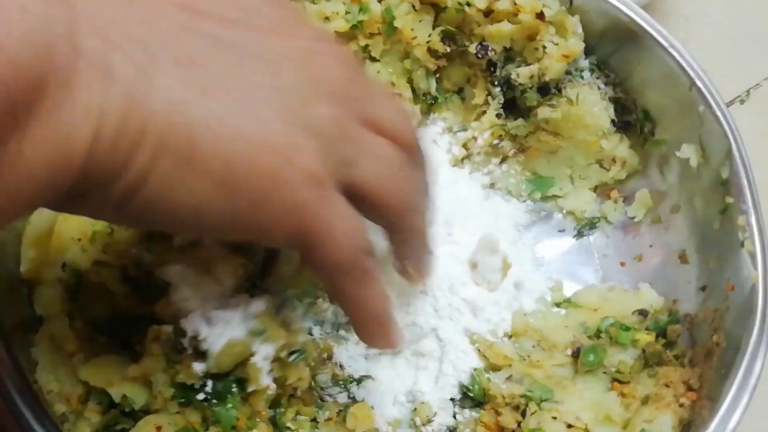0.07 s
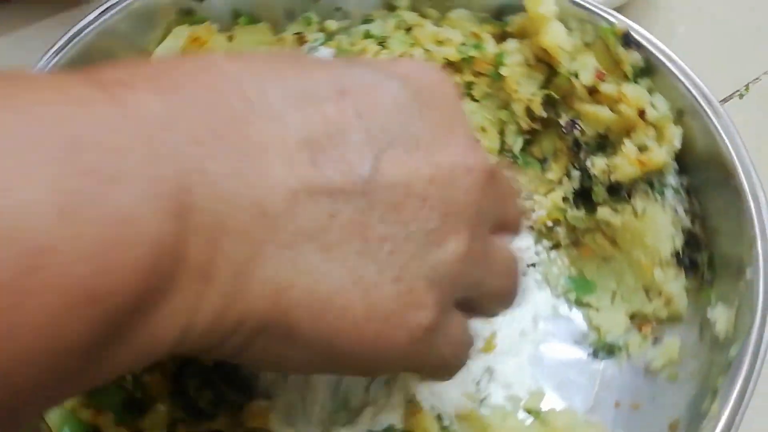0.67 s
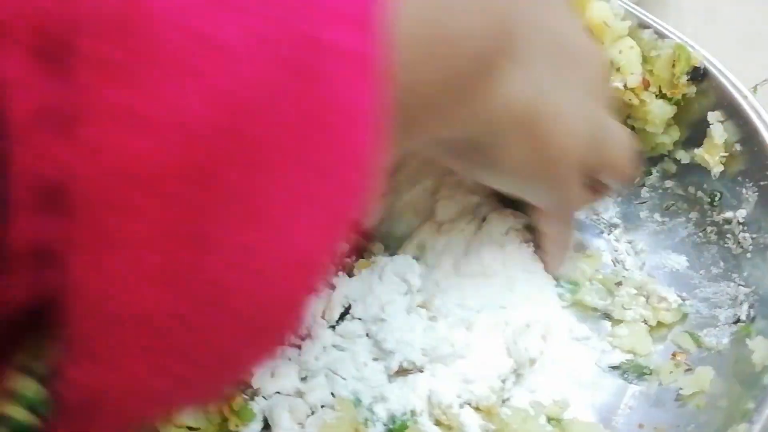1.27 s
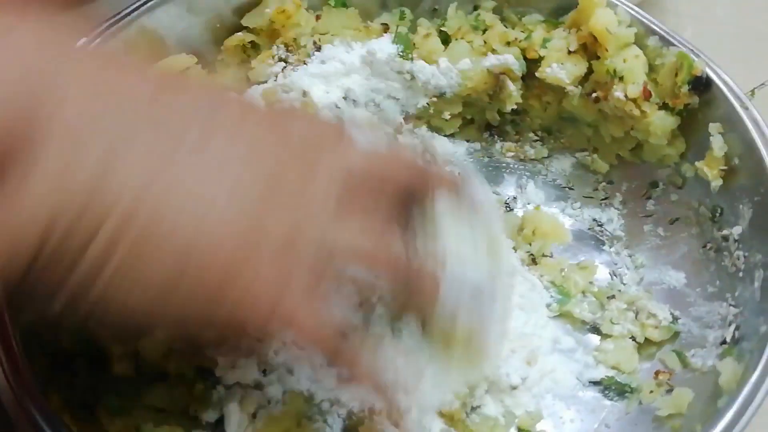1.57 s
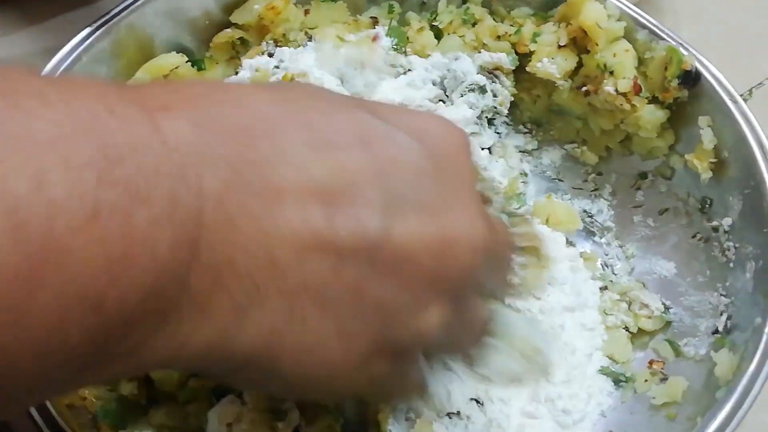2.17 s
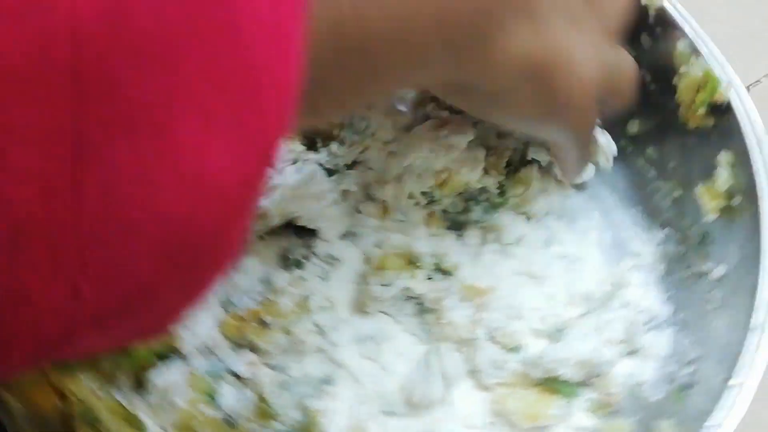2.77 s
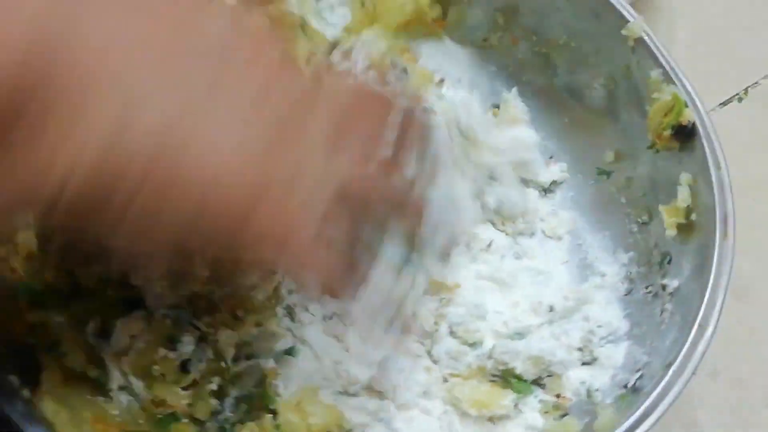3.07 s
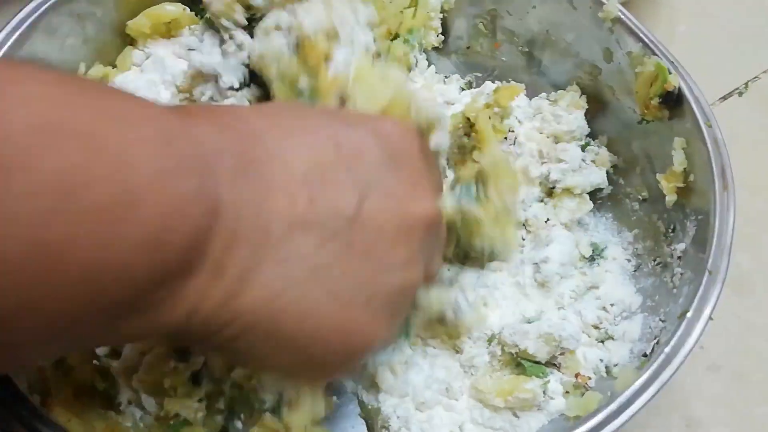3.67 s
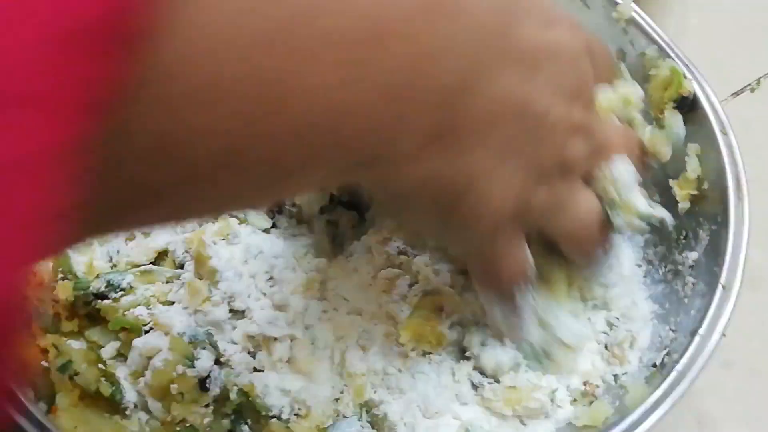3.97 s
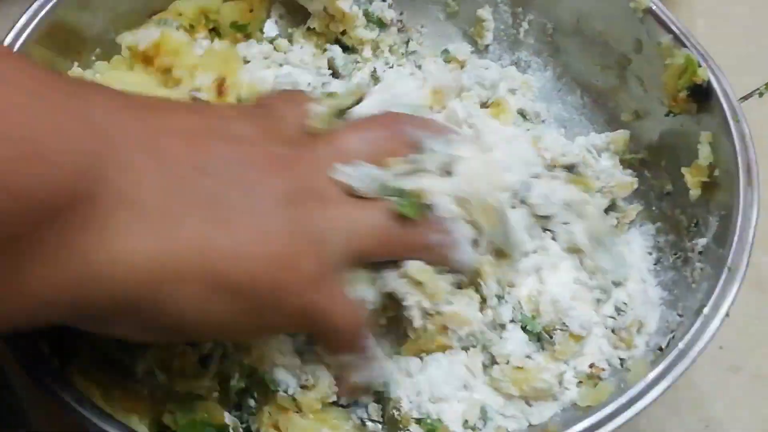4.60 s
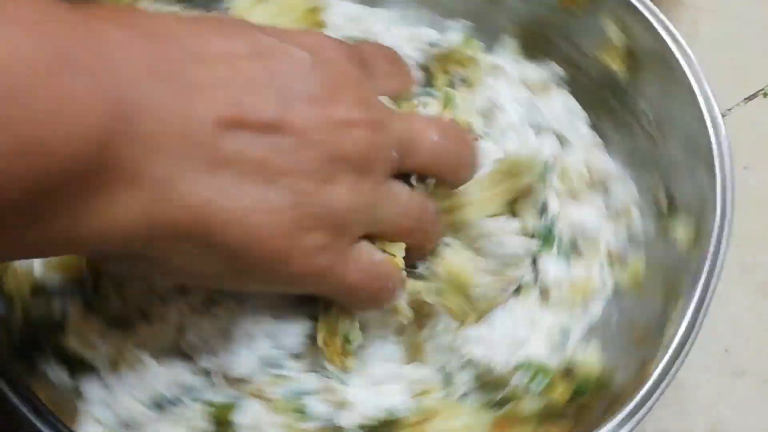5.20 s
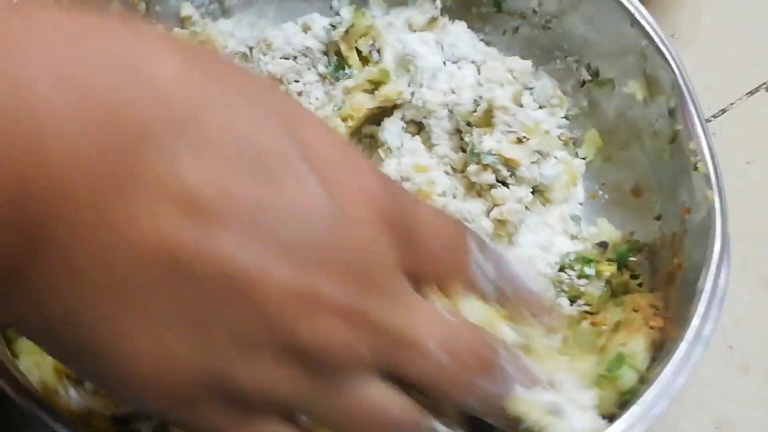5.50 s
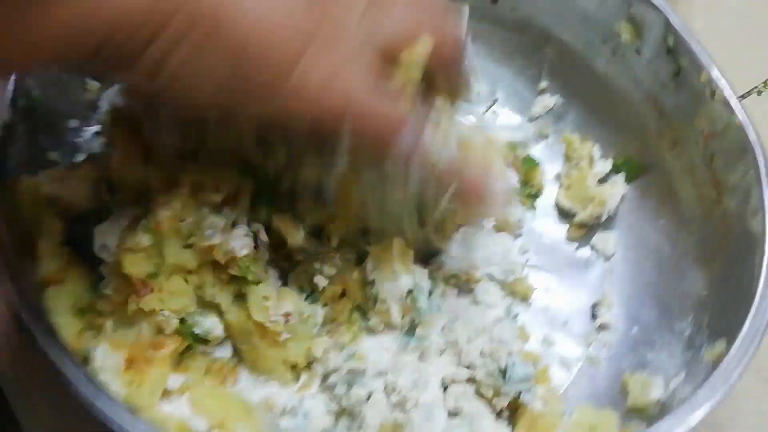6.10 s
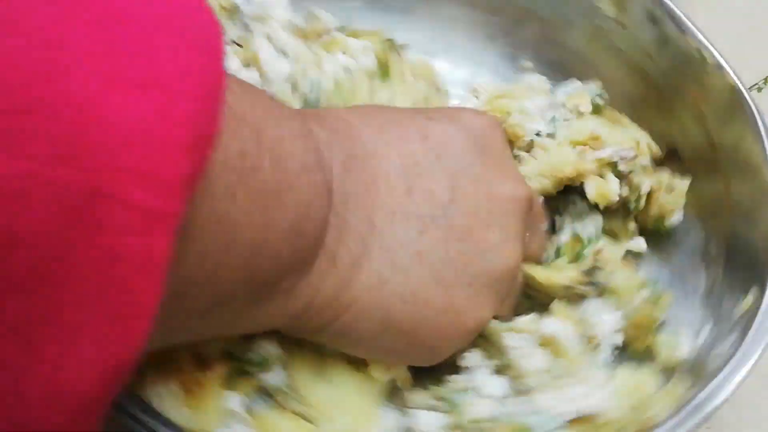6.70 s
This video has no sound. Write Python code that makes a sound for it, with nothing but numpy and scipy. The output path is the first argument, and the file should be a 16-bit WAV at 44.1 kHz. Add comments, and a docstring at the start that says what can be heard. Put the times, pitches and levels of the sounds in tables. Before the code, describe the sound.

A bare hand works flour into mashed potato in a steel bowl, close and fairly dry, over the steady low rumble of a small, hard kitchen. Crumbs scatter with a sticky pop at 0.2 seconds. At about 0.7 seconds the bowl clatters on the tiles and rings briefly, the loudest moment. Flour hisses along the steel around 1 second, and again near 2.4, 4.1 and 5.6 seconds. Throughout, uneven squeezes bring soft squelches, wet crackles and small smacking pops, with occasional thin ticks of flecks hitting metal. From 2.5 to 3.1 seconds the bowl rasps faintly, then shifts with a dull grind and gives a lighter ringing knock at about 3.25 seconds. In the second half the mixing sounds moister, with a fuller squish near 5.9 seconds and soft fingertip plops from 6 seconds until the end, just before 7.

```python
"""A bare hand works flour into mashed potato in a steel bowl, over the low rumble of a small hard kitchen.
First flour hisses along the steel and crumbs scatter; within a second the bowl clatters on the tiles and
rings in its modes. The hand squeezes on: wet films tear with a squelch and air pockets pop. Towards three
seconds the bowl rasps by stick-slip friction, then knocks again. In the second half the sweeps of flour
carry more mash, and fingertips press soft plops from the dough to the end."""
import sys
import numpy as np
from scipy import signal
from scipy.fft import rfft, irfft
from scipy.io import wavfile
from scipy.ndimage import uniform_filter1d

SR = 44100
rng = np.random.default_rng(int(sys.argv[2]) if len(sys.argv) > 2 else 0)


def to_wav(sig):
    """Store sig (one row per channel, or 1-D mono) as 16-bit WAV at the path in sys.argv[1].

    Samples outside -1..1 are clipped; the rate is SR.
    """
    pcm = np.clip(np.atleast_2d(sig), -1, 1) * 32767
    pcm = np.round(pcm).astype(np.int16)
    wavfile.write(sys.argv[1], SR, pcm.T)  # frames by channels


N = 302085
TIME = np.arange(N) / SR
# spectrum of a thin, bright snap: frequency_hz, level_db
SNAP_SPECTRUM = [(800, -37), (2000, -40), (3200, -11), (5000, 4), (7500, 8), (10300, 11), (12500, -7),
                 (16000, -55)]


def amp(db):
    """Decibels as an amplitude ratio."""
    return 10 ** (np.asarray(db) / 20)


def unit(x):
    """Normalisation to an rms of 1."""
    return x / np.sqrt(np.mean(x ** 2) + 1e-20)


def read(points, hz):
    """Interpolation of a table on a logarithmic frequency axis."""
    f, value = np.transpose(points)
    return np.interp(np.log(hz + 1), np.log(f), value)


def add(mix, s, sound):
    """Superposition: a two-channel sound joins the mix at time s."""
    part = mix[:, round(s * SR):][:, :sound.shape[1]]
    part += sound[:, :part.shape[1]]


def colour(x, spectrum, size=2048):
    """Spectral shaping by a minimum-phase filter of unit energy."""
    log_gain = np.log(amp(read(spectrum, abs(np.fft.fftfreq(size, 1 / SR)))))
    taps = np.fft.ifft(np.exp(np.conj(signal.hilbert(log_gain)))).real
    return signal.fftconvolve(x, taps[None] / np.linalg.norm(taps), axes=1)[:, :x.shape[1]]


def band(x, hz, q):
    """A fixed second-order resonance of quality factor q."""
    return signal.lfilter(*signal.iirpeak(hz, q, SR), x)


def resonate(x, hz, width_hz):
    """A gliding resonance by heterodyning: shift the curve hz down to zero, smooth twice, shift back."""
    carrier = np.exp(2j * np.pi * np.cumsum(hz) / SR)
    pole = np.exp(-np.pi * width_hz / SR)
    return (carrier * signal.lfilter([(1 - pole) ** 2], [1, -2 * pole, pole * pole], x / carrier)).real


def pair(x):
    """Spatial coherence: mid and side signals become two close microphones, most alike in the bass."""
    # likeness of the microphones: frequency_hz, coherence
    likeness = [(130, 1), (300, 0.88), (700, 0.5), (1400, 0.78), (3100, 0.29), (6800, 0.33), (10000, 0.8),
                (15000, 0.6)]
    coherence = np.clip(read(likeness, np.fft.rfftfreq(x.shape[1], 1 / SR)), 0, 1)
    mid, side = rfft(x) * np.sqrt([(1 + coherence) / 2, (1 - coherence) / 2])
    return irfft(np.array([mid + side, mid - side]), x.shape[1])


def flutter(per_s, depth_db):
    """Random modulation: a factor that wanders about 1."""
    knots = np.arange(0, TIME[-1] + 1, 1 / per_s)
    return amp(depth_db * np.interp(TIME, knots, rng.standard_normal(len(knots))))


def swell(peak_s, length_s, rising=0.75, shape=2):
    """An envelope that peaks at 1; rising is the share spent growing, shape 1 is pointed and 2 rounded."""
    offset = np.linspace(-2, 2, 201)
    distance = np.maximum(-offset / rising, offset / (1 - rising))
    return np.interp(TIME, peak_s + length_s * offset, np.exp(-distance ** shape), 0, 0)


def grains(per_s, spread_db, size=N):
    """Shot noise: a random train of tiny ruptures of unequal strength."""
    strength = amp(spread_db * np.minimum(rng.exponential(1, size), 4.5))
    return unit(rng.standard_normal((2, size)) * strength * (rng.random(size) < per_s / SR))


def contact(fade_s, chatter, size=2048):
    """Impact excitation: one sharp push, then a fading rattle whose relative strength is chatter."""
    burst = rng.standard_normal((2, size)) * np.exp(-np.arange(size) / SR / fade_s)
    burst *= chatter / np.linalg.norm(burst, axis=1, keepdims=True)
    burst[0, 0] += 1
    return burst / np.linalg.norm(burst[0])


def room_tone():
    """Background noise: a slowly sinking rumble, a wavering hum that swells once, and faint steady hiss."""
    # spectra of the rumble and the hiss: frequency_hz, level_db
    rumble_spectrum = [(25, -12.5), (56, -26.5), (72, -10), (88, 0.5), (108, 1), (145, -6.5), (175, -3),
                       (200, -6.5), (225, -16.5), (290, -20.5), (385, -20), (480, -34.5), (1000, -56.5)]
    air_spectrum = [(100, -27), (400, 1.5), (1500, -4), (3000, -6), (6000, -14.5), (10000, -68),
                    (16000, -43)]
    hum_hz, sink_db_per_s = 165, 0.67
    rumble = colour(rng.standard_normal((2, N)), rumble_spectrum, size=16384)
    rumble *= amp(-40 - sink_db_per_s * TIME)
    cycles = np.cumsum(hum_hz * flutter(per_s=9, depth_db=-0.48)) / SR
    hum_level = amp(-56.5) + amp(-45.5) * swell(peak_s=2.42, length_s=0.99)
    hum = hum_level * unit(np.sin(2 * np.pi * cycles) * flutter(per_s=5.2, depth_db=6.0))
    air = amp(-61) * colour(rng.standard_normal((2, N)), air_spectrum)
    return hum + pair(rumble + air)


def kitchen(x):
    """Reverberation: dense reflections off tiles, lasting longest in the lower middle range."""
    # reverberation time: frequency_hz, t60_s
    decay_times = [(150, 0.047), (400, 0.75), (1400, 0.46), (3000, 0.46), (5000, 0.48), (9000, 0.29),
                   (15000, 0.042)]
    build_up = np.clip(TIME[:SR] / 0.0062 - .5, 0, 1)
    reflections = rng.standard_normal((2, SR)) * (rng.random((2, SR)) < 0.1) * build_up
    hz, t, spectra = signal.stft(pair(reflections), SR, nperseg=256)
    decay = amp(-60 * t / read(decay_times, hz)[:, None])
    tail = signal.istft(spectra * decay, SR, nperseg=256)[1]
    tail /= np.linalg.norm(tail, axis=1, keepdims=True)
    return signal.fftconvolve(x.mean(0)[None], tail, axes=1)[:, :x.shape[1]]


def wobbles():
    """Rocking oscillation: the loaded bowl throbs briefly under the hand."""
    # throbs: start_s, length_s, level_db, first_hz, last_hz
    throbs = [(0.242, 0.083, -44, 127.6, 105), (1.712, 0.1, -37, 88.7, 90), (3.223, 0.075, -47, 53, 73),
              (3.264, 0.19, -35, 81.3, 93.3), (4.796, 0.2, -39.5, 87, 95), (5.035, 0.096, -40, 89.4, 91)]
    out = np.zeros((2, N))
    for s, length, db, first_hz, last_hz in throbs:
        hz = np.linspace(first_hz, last_hz, round(length * SR))
        throb = np.sin(2 * np.pi * np.cumsum(hz) / SR) * signal.windows.tukey(len(hz), .7)
        add(out, s, amp(db) * np.tile(unit(throb), (2, 1)))
    return out


def shoves():
    """Stick-slip friction: the shoved bowl grinds dully on its base."""
    # pushes on the bowl: start_s, level_db, fade_s
    pushes = [(0.0, -40, 0.053), (2.965, -41, 0.056), (3.105, -44, 0.066), (3.228, -44, 0.05),
              (6.16, -48, 0.084)]
    # spectrum of the grind: frequency_hz, level_db
    grind_spectrum = [(130, -25), (250, 0.5), (350, -3), (480, -9.5), (700, -12), (1300, -25), (3000, -61)]
    onset_s = 0.01
    out = np.zeros((2, N))
    t = TIME[:SR // 2]
    for s, db, fade_s in pushes:
        push = (1 - np.exp(-t / onset_s)) * np.exp(-t / fade_s)
        add(out, s, amp(db) * push * grains(per_s=1200, spread_db=1.5, size=len(t)))
    return pair(colour(out, grind_spectrum))


def skids():
    """Stick-slip friction: fine grit excites one broad resonance of the steel, and the room answers."""
    # rubs by the tiles or a finger: start_s, length_s, level_db, first_hz, last_hz, width_hz
    rubs = [(0.425, 0.17, -60, 1860, 1930, 400), (1.282, 0.14, -52, 3520, 3560, 900),
            (2.511, 0.17, -53.5, 1470, 1630, 700), (2.578, 0.36, -53, 1970, 1580, 750),
            (2.776, 0.33, -53.5, 1560, 1480, 700), (3.72, 0.32, -68.5, 3070, 3090, 700),
            (4.23, 0.3, -63.5, 1255, 1370, 380), (4.59, 0.14, -66, 3800, 3800, 800),
            (5.52, 0.14, -59.5, 1940, 1860, 320), (5.839, 0.13, -49, 1080, 1190, 550)]
    out = np.zeros((2, N))
    for s, length, db, first_hz, last_hz, width_hz in rubs:
        hz = np.linspace(first_hz, last_hz, round(length * SR))
        rasp = resonate(grains(per_s=4000, spread_db=4.5, size=len(hz)), hz, width_hz)
        add(out, s, amp(db) * unit(rasp * signal.windows.tukey(len(hz), .6)))
    out = pair(out)
    return out + amp(-0.5) * kitchen(out)


def hollow(x, load):
    """Damped resonances of the bowl join a sound made in it; their tuning shifts as the mash moves."""
    # resonances of the loaded bowl: centre_hz, width_hz, level_db
    resonances = [(870, 56, -3.5), (1130, 360, -6), (1417, 440, -5), (2210, 240, -10), (3220, 170, -2)]
    tuning = np.exp(0.042 * load) * np.ones(x.shape[1])
    return x + sum(2 * amp(db) * resonate(x, hz * tuning, width) for hz, width, db in resonances)


def ring(modes):
    """Free vibration: modes decay exponentially and reach each microphone in their own phase."""
    t = TIME[:SR]
    tones = sum(amp(db - 60 * t / t60) * np.sin(2 * np.pi * (hz * t + rng.random((2, 1))))
                for hz, db, t60 in modes)
    return tones * (1 - np.exp(-t / 0.00016))


def knocks():
    """Impact on the tiles excites the bowl's modes: a clack, ringing steel, a ping and splash of the rim."""
    # blows: start_s, level_db, cutoff_hz, ping_db, ring_and_room_db, struck_spot_hz, boom_db
    blows = [(0.6476, -26, 2530, -38, -6.5, 800, -24), (0.6503, -13.5, 3150, -34, -2, 2150, -20),
             (0.7075, -14.5, 3500, -2, -2.5, 1800, -2), (0.7442, -11.2, 4200, -5, -2.3, 1900, -4),
             (3.2494, -21, 5200, -28, -7, 2700, -5), (3.2537, -26, 7000, -24, -4.5, 2600, -4)]
    # modes of the bowl and of its rim: pitch_hz, level_db, t60_s
    bowl_modes = [(364, 3, .7), (1069, 3, .55), (1100, 4, .55), (1263, 2, .5), (1338, 5, .65),
                  (1484, 4, .7), (1507, 3, .6), (1542, 2, .55), (1880, 3, .5), (2165, 1, .45),
                  (3198, 1, .35)]
    rim_modes = [(8581, -13, .22), (8640, -14, .2), (8690, 0, .03), (12050, -3, .02), (15600, -19, .06)]
    # spectra of the clack and the splash: frequency_hz, level_db
    clack_spectrum = [(120, -43), (230, -12), (330, 4), (470, 1.5), (620, -1.5), (740, 0), (1350, 1.5),
                      (2300, -6), (3200, -5.5), (4200, -12), (7000, -10), (14000, -9.5)]
    splash_spectrum = [(2000, -35), (7500, 3), (10300, -1), (12300, -5), (16000, -15)]
    spot_width_hz, boom_hz = 240, 510
    out = np.zeros((2, N))
    impulse = signal.unit_impulse(SR) * np.ones((2, 1))
    for s, db, cutoff_hz, ping_db, ring_db, spot_hz, boom_db in blows:
        low_pass = signal.butter(4, cutoff_hz, fs=SR, output="sos")  # each knock has its own brightness
        strike = pair(contact(fade_s=.0036, chatter=1.8, size=SR))
        strike += amp(ring_db - 2.3) * kitchen(impulse)
        clack = signal.sosfilt(low_pass, hollow(colour(strike, clack_spectrum), load=0))
        clack += amp(7) * band(clack, spot_hz, q=spot_hz / spot_width_hz)
        clack += (amp(boom_db) - 1) * band(clack, boom_hz, q=1)  # turns down the boom of the base
        ping = amp(ping_db - 26) * ring(rim_modes)
        body = amp(ring_db - 28) * ring(bowl_modes)
        steel = pair(body + ping) + amp(2) * kitchen(ping)
        splash = amp(ping_db - 2.5) * colour(contact(fade_s=0.014, chatter=4.4, size=SR), splash_spectrum)
        add(out, s, amp(db) * (amp(21) * clack + steel + splash))
    return out


def ticks():
    """Light impacts: single dry flecks land on the steel with a thin, high click."""
    # flecks: start_s, level_db
    flecks = [(2.423, -29), (2.448, -22), (2.49, -18), (2.939, -20.5), (3.390, -24), (4.005, -30.5),
              (5.557, -29), (5.604, -24.5), (6.392, -19), (6.643, -21), (6.762, -28)]
    out = np.zeros((2, N))
    for s, db in flecks:
        add(out, s, amp(db) * contact(fade_s=0.002, chatter=2.4))
    return pair(colour(out, SNAP_SPECTRUM))


def spills():
    """Granular impacts: a shower of crumbs lands on the steel all at once and fades."""
    # showers: start_s, level_db, fade_s
    showers = [(0.195, -39, 0.016), (0.208, -35.5, 0.03), (1.553, -32.5, 0.011), (1.569, -29, 0.0031)]
    # spectrum of crumbs on steel: frequency_hz, level_db
    crumb_spectrum = [(300, 0), (800, -8.5), (1300, 7.5), (1900, -3), (2700, 5.5), (5000, 0), (10300, -4),
                      (12500, -16), (16000, -27)]
    out = np.zeros((2, N))
    t = TIME[:SR // 2]
    for s, db, fade_s in showers:
        add(out, s, amp(db) * np.exp(-t / fade_s) * grains(per_s=7000, spread_db=0.5, size=len(t)))
    return pair(colour(out, crumb_spectrum))


def plop(hz, rise_hz, fade_s):
    """Cavity resonance: a small air pocket rings for a few cycles and rises in pitch as it opens."""
    t = TIME[:2048]
    pitch_hz = hz + rise_hz * (1 - np.exp(-t / 0.0014))
    tone = np.sin(2 * np.pi * np.cumsum(pitch_hz) / SR) * np.exp(-t / fade_s)
    return tone / np.linalg.norm(tone)


def presses():
    """Dough yields to the fingertips: a cavity's plop and a short squish, with reverberation."""
    # fingertip presses: start_s, level_db, pitch_hz
    fingertips = [(0.477, -31.5, 1120), (1.624, -23, 960), (1.631, -20, 897), (1.845, -27.5, 1126),
                  (5.178, -29.5, 1010), (5.966, -18, 1080), (5.978, -26, 1150), (6.168, -21.5, 920),
                  (6.218, -26, 990), (6.808, -21, 1150)]
    # spectrum of the squish: frequency_hz, level_db
    squish_spectrum = [(150, -32), (450, -11), (900, 5), (1500, -3.5), (2100, -10), (3500, -10),
                       (7000, -33)]
    onset_s, fade_s = 0.0014, 0.0033
    out = np.zeros((2, N))
    t = TIME[:2048]
    onset = 1 - np.exp(-(t / onset_s) ** 2)
    for s, db, hz in fingertips:
        pocket = unit(onset * plop(hz, rise_hz=120, fade_s=fade_s)) * [[1], [0]]  # mid signal only
        burst = onset * np.exp(-t / fade_s) * rng.standard_normal((2, len(t)))
        squish = amp(4) * unit(colour(burst, squish_spectrum))
        add(out, s, amp(db) * (pocket + squish) / np.sqrt(len(t)))
    out = pair(out)
    return out + amp(-5.5) * kitchen(out)


def small_pops(squeeze, count=16):
    """A random point process of faint pops: the harder the squeeze, the likelier and stronger they are."""
    over_mash_db, range_db, tap_db, snap_db = 8.5, 4, -17, -30
    work = np.cumsum(np.sqrt(squeeze))
    when, size = rng.random((count, 2)).T
    at = np.searchsorted(work, when * work[-1])
    levels_db = 20 * np.log10(squeeze[at]) + over_mash_db + range_db * (2 * size - 1)
    return [(s, db, tap_db, snap_db) for s, db in zip(TIME[at], levels_db)]


def pops(squeeze):
    """Sudden release: air pockets burst and fingers unstick with a smack, wet snap, plop and dull tap."""
    # sticky pops: start_s, level_db, relative_tap_db, relative_snap_db
    releases = [(0.137, -42.5, -5, -24), (0.197, -19.5, -40, -10.5), (0.864, -20.5, -35, -19.5),
                (1.04, -38.5, -1, -23), (1.058, -24.5, -19, -19), (1.139, -34, -12.5, -26),
                (1.379, -31, -27, -6), (1.623, -33, -5, -32), (1.685, -30.5, -18, -9),
                (1.78, -31.5, -37, -29), (2.981, -24, -20, -31), (2.997, -26, -15, -30),
                (3.044, -34.5, -19, -2.5), (3.119, -22, -23.5, -23), (3.51, -33, -8.5, -26),
                (4.129, -31, -11, -32), (4.195, -28, -15, -18), (4.507, -35, -8, -9),
                (4.78, -30, -12.5, -35), (5.487, -38.5, -9.5, -12), (5.610, -32, -20, -16.5),
                (5.656, -36.5, -8, -28), (6.021, -27, -12, -26), (6.405, -37, -9, -1),
                (6.538, -27, -23, -33)]
    # spectra of the tap on damped steel and of the smack: frequency_hz, level_db
    tap_spectrum = [(150, -49), (400, -1.5), (650, -1.5), (1400, 1.5), (2000, 2), (4500, -19), (12000, -70)]
    smack_spectrum = [(700, -44), (1800, 5.5), (3000, 13.5), (4500, 4.5), (7000, 3), (13000, -58)]
    out = np.zeros((2, N))
    for s, db, tap_db, snap_db in releases + small_pops(squeeze):
        touch = colour(contact(fade_s=0.0088, chatter=0.76), tap_spectrum)
        tap = amp(21.5) * hollow(touch, load=rng.standard_normal())
        pocket = amp(19) * plop(rng.uniform(770, 1196), rise_hz=260, fade_s=.0035)
        smack = amp(10) * colour(contact(fade_s=0.0035, chatter=2.3), smack_spectrum)
        snap = amp(20) * colour(contact(fade_s=0.0063, chatter=0.89), SNAP_SPECTRUM)
        add(out, s, amp(db) * (smack + amp(tap_db) * (tap + pocket) + amp(snap_db) * snap))
    return pair(out)


def crackles(per_s=220, bands=5):
    """Adhesion fails: sticky spots let go one by one, each snapping in one of several resonant bands."""
    pitches_hz = np.geomspace(2400, 10500, bands)
    snaps = sum(band(grains(per_s / bands, spread_db=3.6), hz, q=6) for hz in pitches_hz)
    return unit(colour(snaps, SNAP_SPECTRUM))


def patchy(x, depth_db):
    """Spectral modulation: as crumbs of different sizes pass, each band swells and fades by itself."""
    spectra = signal.stft(x, nperseg=256)[2]
    field = uniform_filter1d(rng.standard_normal(spectra.shape[1:]), size=6, axis=0)
    field = uniform_filter1d(field, size=7, axis=1)
    return unit(signal.istft(spectra * amp(depth_db * unit(field)), nperseg=256)[1][:, :N])


def hand_motion():
    """Incoherent gestures add in power: amplitudes of slide, squeeze and drag, and nearness to the wall."""
    # fingers sweep flour along the wall: start_s, rise_s, length_s, level_db, slowing_db_per_s
    sweeps = [(0.18, 0.032, 0.38, -59, 5.5), (0.995, 0.18, .46, -38, 41.5), (2.412, 0.121, .62, -46, 21),
              (4.079, .11, 0.36, -43, 53), (5.571, 0.15, .49, -45.5, 10)]
    # the hand closes on the mash: tightest_s, length_s, level_db, relative_flour_db, relative_drag_db
    squeezes = [(0.0, 0.132, -71.5, -10, 23.5), (0.303, 0.098, -56, -8, 0.5), (0.575, 0.2, -57, -10, -25),
                (1.008, .17, -59, 8.5, -7), (1.401, .14, -49.5, -2, -18), (1.643, 0.12, -63, -4, 7),
                (1.88, .2, -59, 9, -5), (2.017, .13, -55.5, -5, -16), (2.943, .2, -51, 0, -4),
                (3.235, .22, -53.5, -6, -2.5), (3.437, .18, -47.5, -2, -6.5), (3.647, 0.16, -66, 6, 3),
                (4.299, 0.18, -54.5, -4, -11), (4.676, 0.11, -63.5, -13, 7.5), (4.807, .22, -50, -3.5, -19),
                (5.028, 0.26, -57.5, 1.5, -5), (5.274, 0.16, -57.5, 3, -10), (5.902, .17, -42, 1, -17),
                (6.034, .1, -53, 10.5, -2.5), (6.22, 0.16, -56.5, 0.5, 0.5), (6.53, 0.45, -53.5, -2.5, -7),
                (6.78, 0.11, -66.5, 15.5, -10)]
    lift_db_per_s, blending_db_per_s = 138, 2
    sweep = np.zeros(N)
    for start, rise_s, length, db, slowing in sweeps:
        t = TIME - start
        rise = np.sin(np.pi / 2 * np.clip(t / rise_s, 0, 1)) ** 2
        fade_db = slowing * np.clip(t - rise_s, 0, length) + lift_db_per_s * np.clip(t - length, 0, 1)
        sweep += rise * amp(db - fade_db)
    carried = sweep * amp(blending_db_per_s * TIME)  # as flour is worked in, sweeps carry more mash
    # each power has a floor: the hand never quite rests
    slide_power = amp(-67) ** 2 + sweep ** 2
    squeeze_power = amp(-71) ** 2 + (amp(-16) * carried) ** 2
    drag_power = amp(-67) ** 2 + (amp(-33) * carried) ** 2
    for s, length, db, flour_db, drag_db in squeezes:
        power = (amp(db) * swell(s, length, rising=0.5, shape=2.1)) ** 2
        slide_power += amp(flour_db) ** 2 * power
        squeeze_power += power
        drag_power += amp(drag_db) ** 2 * power
    at_wall = sweep / (sweep + amp(-40))  # strong sweeps reach the wall
    return np.sqrt(slide_power), np.sqrt(squeeze_power), np.sqrt(drag_power), at_wall


def kneading(slide, squeeze, drag):
    """Friction and rupture: flour slides, wet films tear in the mash, and the lump sticks and slips."""
    # spectra of sliding flour, tearing mash and the dragged lump: frequency_hz, level_db
    flour_spectrum = [(800, -28.5), (2500, -21.5), (5000, -9.5), (7500, -3.5), (10200, -0.5), (11200, -5.5),
                      (12500, -12.5), (16000, -22.5)]
    mash_spectrum = [(300, -42), (800, -1.5), (1400, -3.5), (2500, 2), (4500, -1), (6500, -9.5),
                     (12000, -52)]
    drag_spectrum = [(150, 2.5), (350, -2), (600, 0.5), (850, 5), (1100, 2.5), (1400, 1.5), (1900, -1.5),
                     (4000, -53)]
    grip = flutter(per_s=70, depth_db=1.7)
    flour = slide * patchy(colour(grains(per_s=12000, spread_db=-0.5), flour_spectrum), depth_db=2.1)
    mash = squeeze * colour(grains(per_s=5500, spread_db=0.5), mash_spectrum)
    lump = drag * colour(grains(per_s=900, spread_db=3.5), drag_spectrum)
    crackle = amp(-10.5) * np.hypot(squeeze, slide) * crackles()
    load = np.log(flutter(per_s=5.4, depth_db=3.5))
    return pair(hollow(grip * (flour + mash + lump), load) + crackle)


def scene():
    """Direct and reverberant sound: the hand is close and fairly dry; knocks and skids fill the room."""
    bowl = knocks() + skids() + shoves() + wobbles()
    room = room_tone()
    slide, squeeze, drag, at_wall = hand_motion()
    pan = amp(4.5 * at_wall * np.array([[-.5], [.5]]))  # sweeps run along the right-hand wall
    hand = spills() + pan * kneading(slide, squeeze, drag) + pops(squeeze) + ticks()
    return hand + amp(-7) * kitchen(hand) + presses() + bowl + room


def record(dry):
    """Level difference and band limit: the left microphone is the louder, and the top treble is cut."""
    # balance of the microphones: frequency_hz, left_minus_right_db
    balance = [(350, 8), (700, 3.5), (1300, 8), (2400, 11), (4400, 7), (8100, 7.5), (15000, 0.5)]
    cutoff_hz = 16550
    ratio = amp(read(balance, np.fft.rfftfreq(N, 1 / SR)))
    gains = 2 * np.array([ratio, np.ones_like(ratio)]) / (1 + ratio)
    heard = irfft(rfft(dry) * gains, N)
    low_pass = signal.firwin(511, cutoff_hz, window=("kaiser", 9), fs=SR)
    return signal.oaconvolve(heard, low_pass[None], "same")


dry = scene()
out = record(dry)
to_wav(out)
```